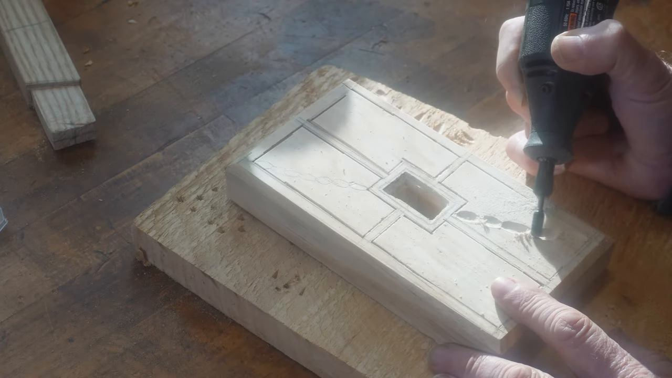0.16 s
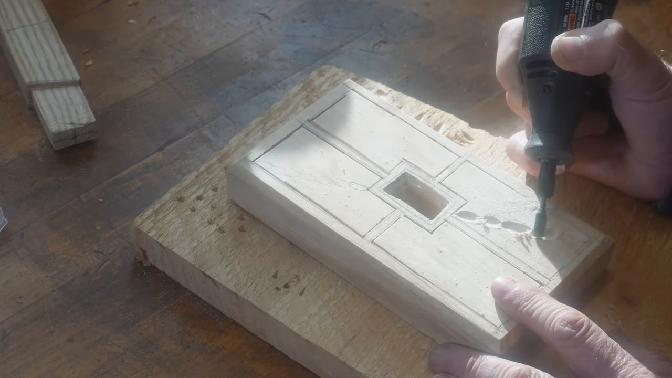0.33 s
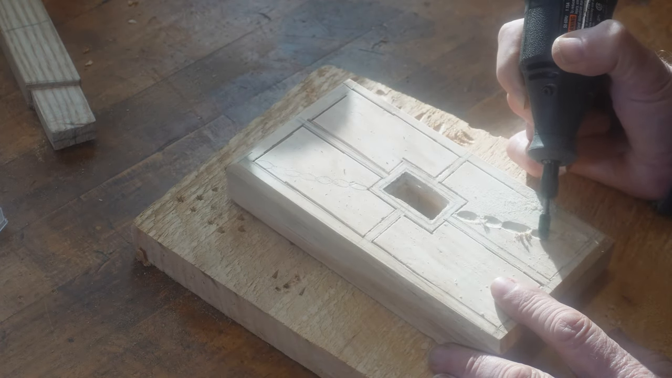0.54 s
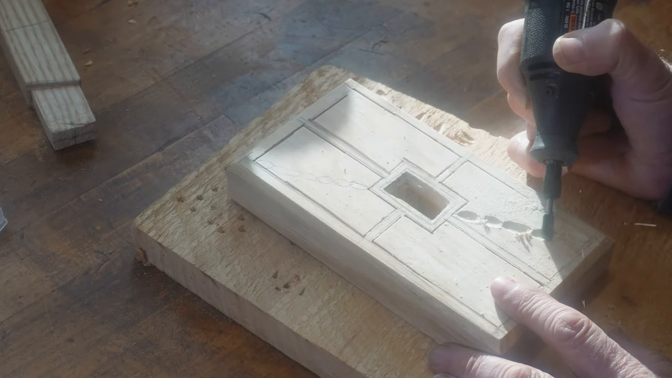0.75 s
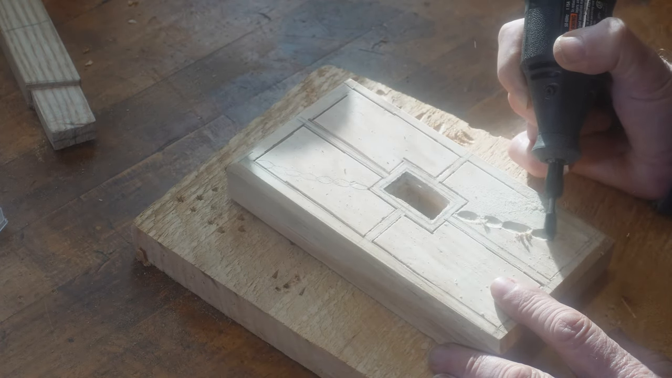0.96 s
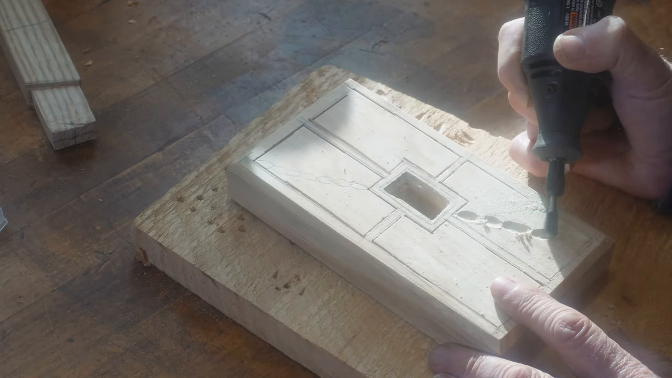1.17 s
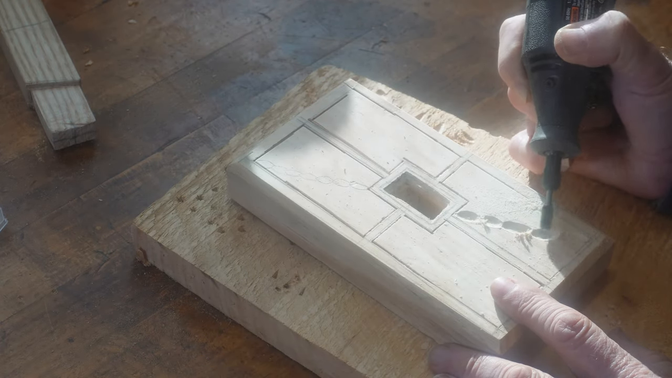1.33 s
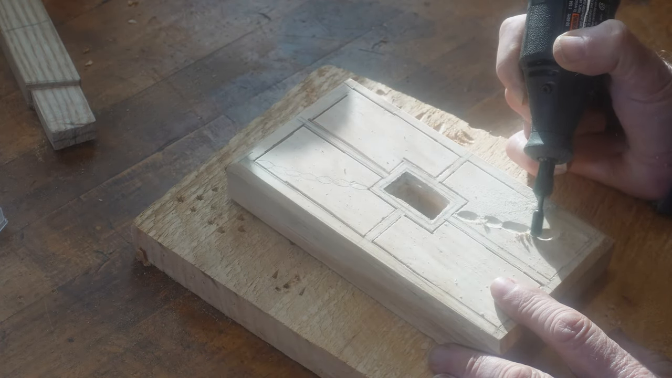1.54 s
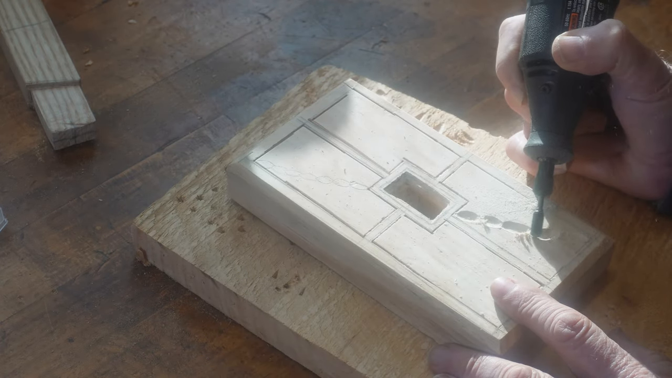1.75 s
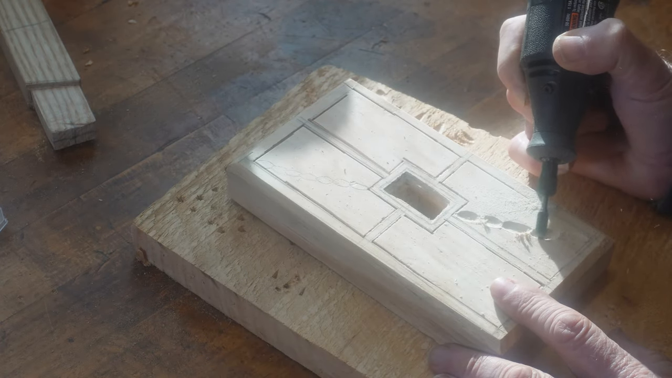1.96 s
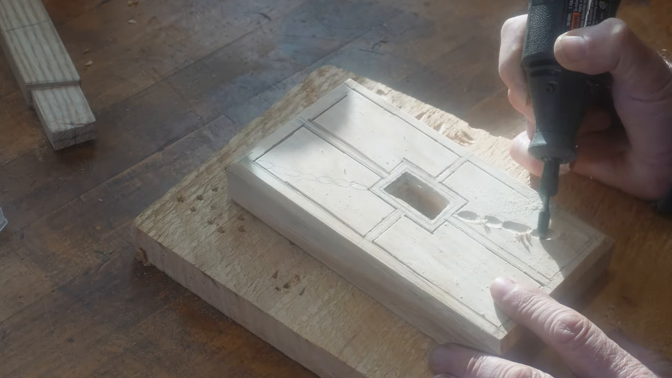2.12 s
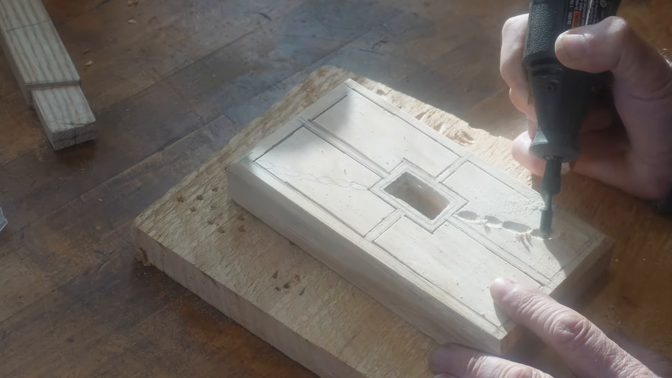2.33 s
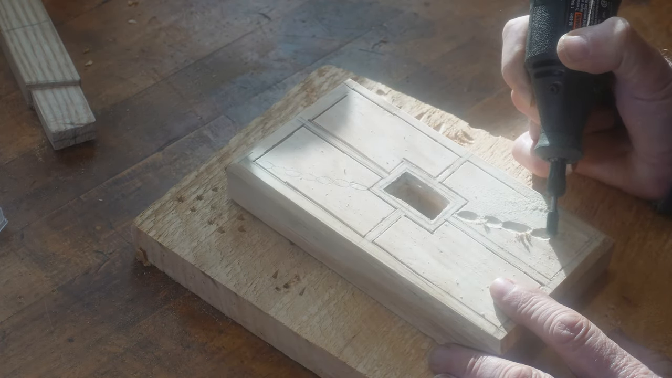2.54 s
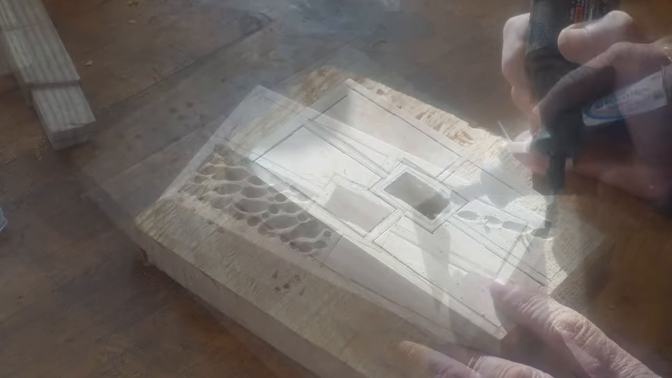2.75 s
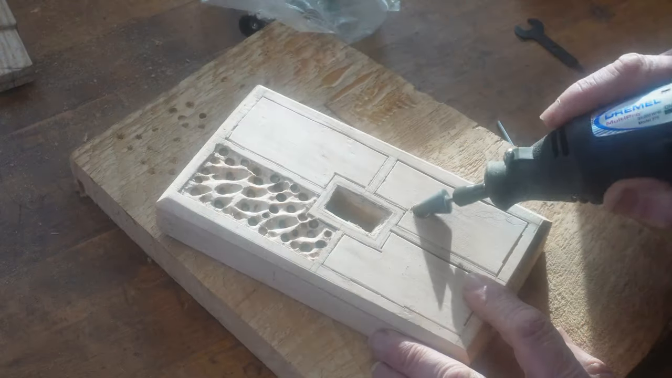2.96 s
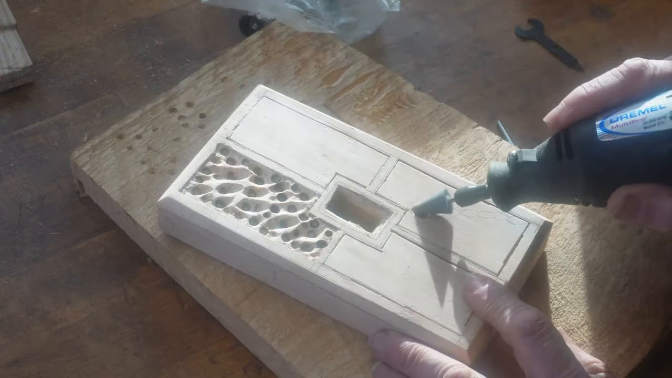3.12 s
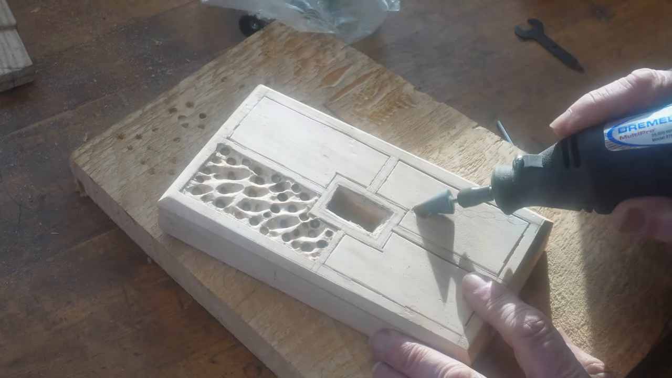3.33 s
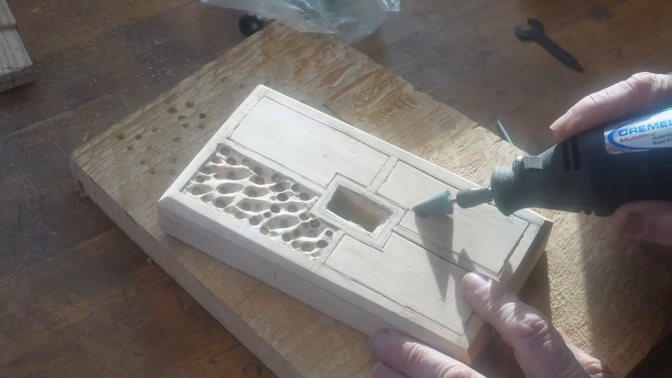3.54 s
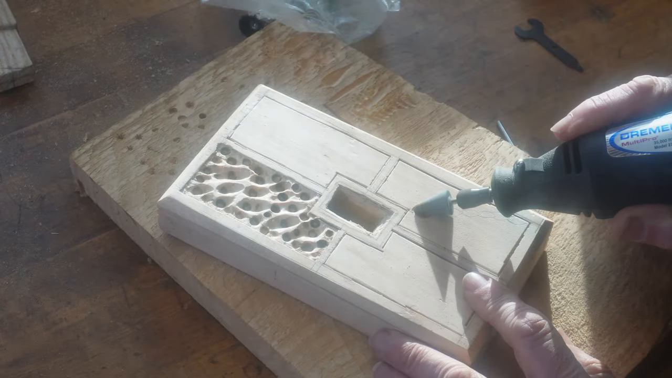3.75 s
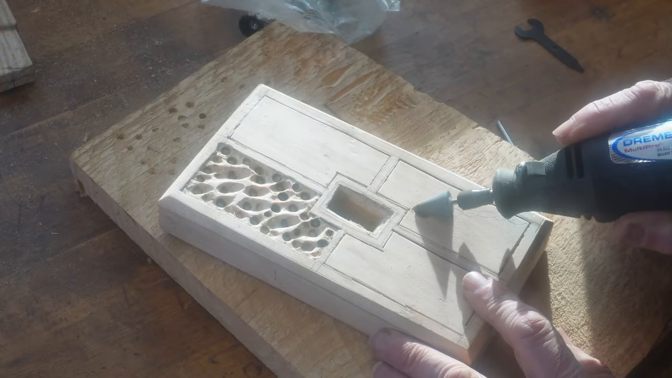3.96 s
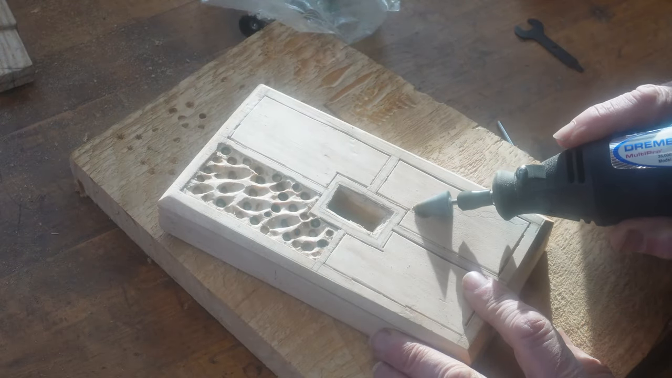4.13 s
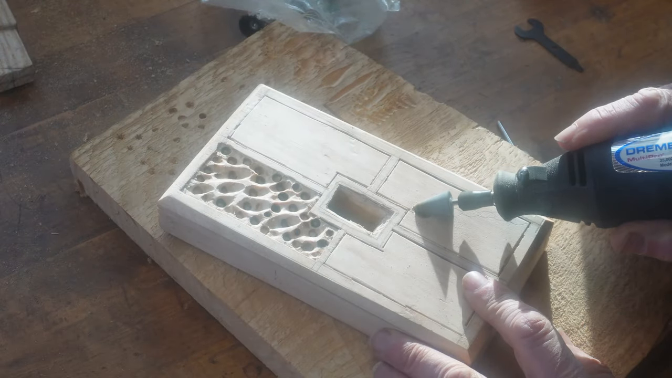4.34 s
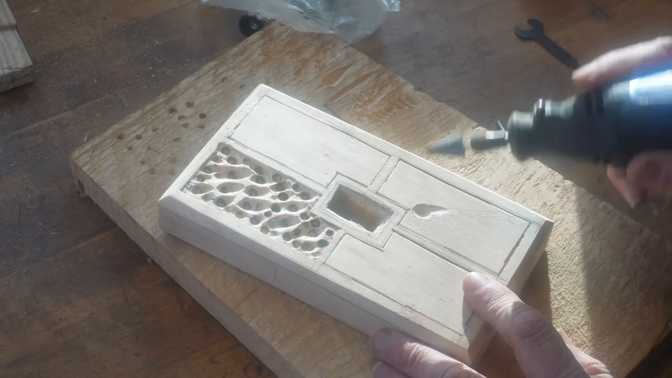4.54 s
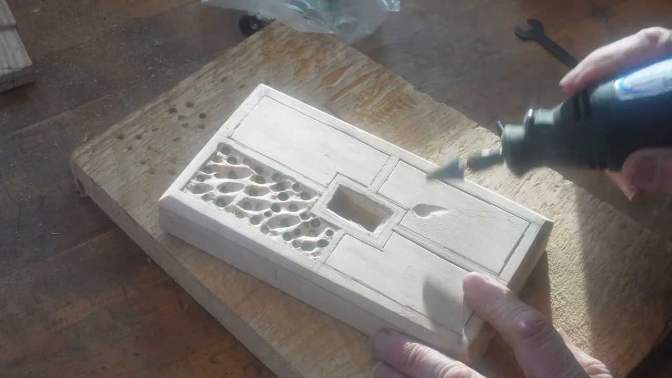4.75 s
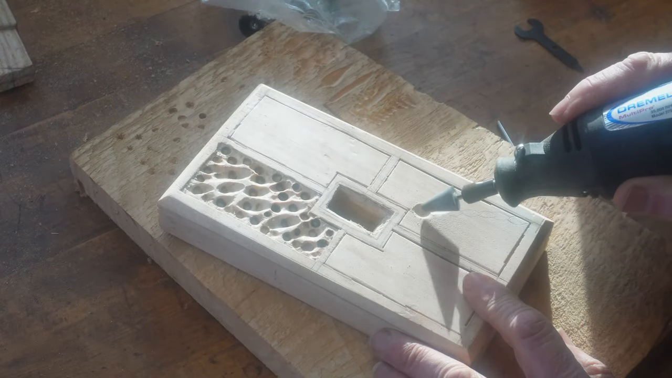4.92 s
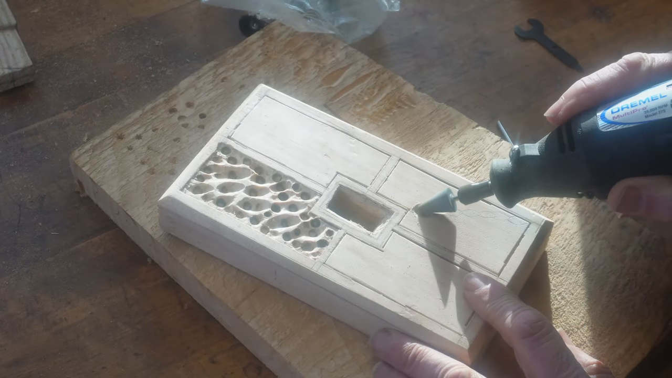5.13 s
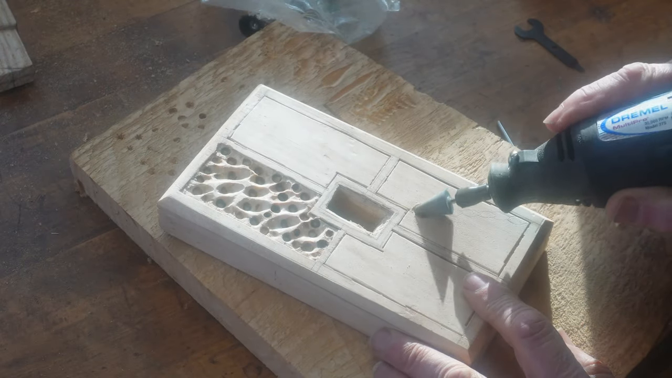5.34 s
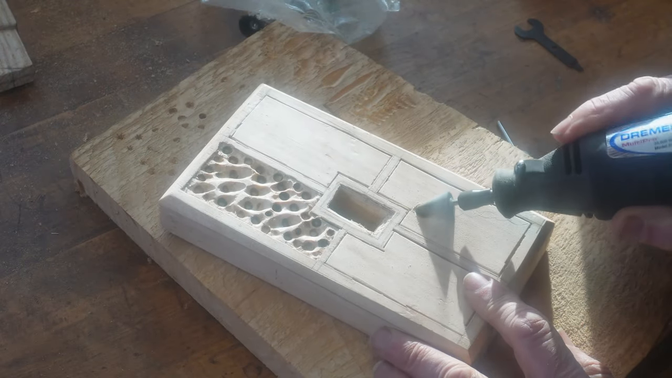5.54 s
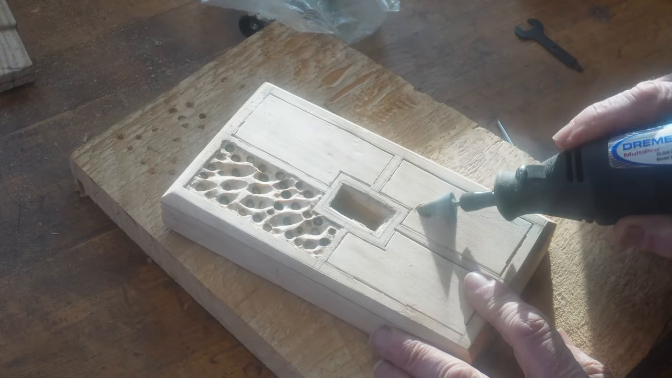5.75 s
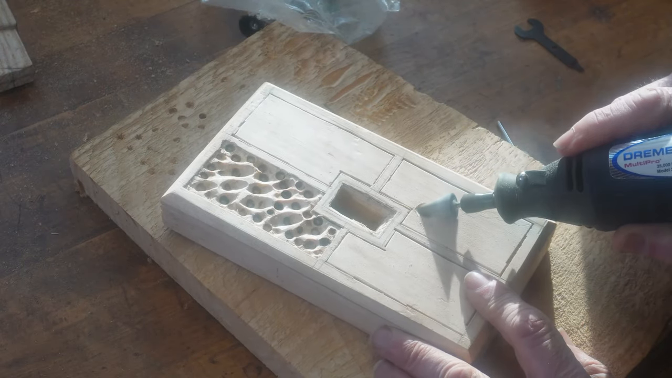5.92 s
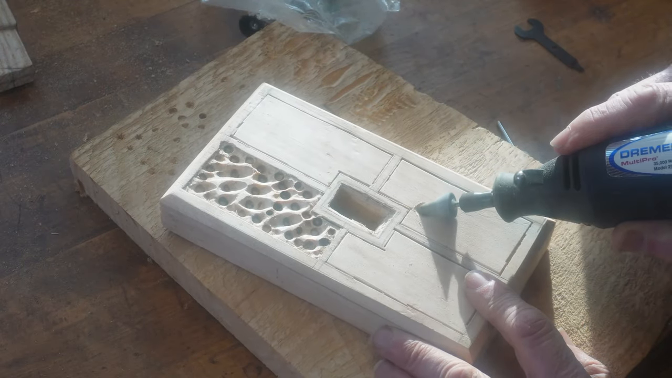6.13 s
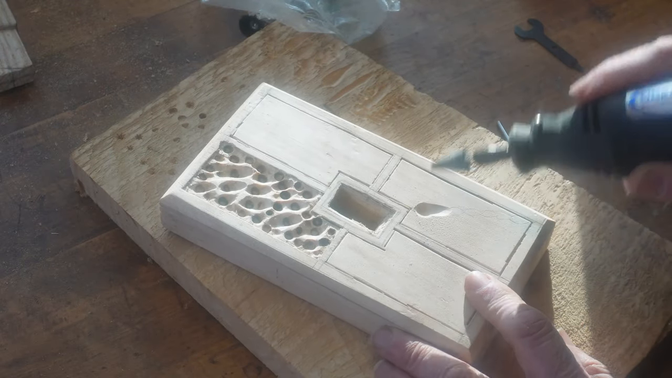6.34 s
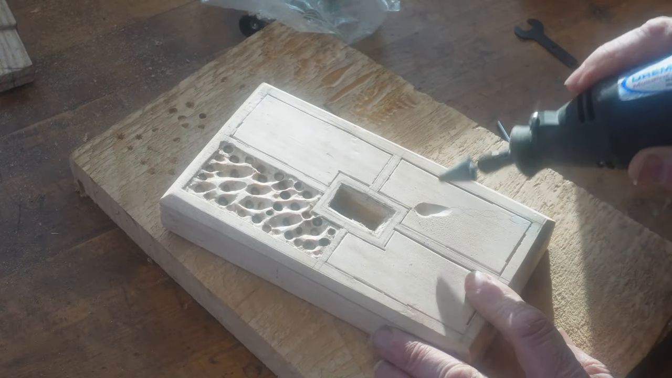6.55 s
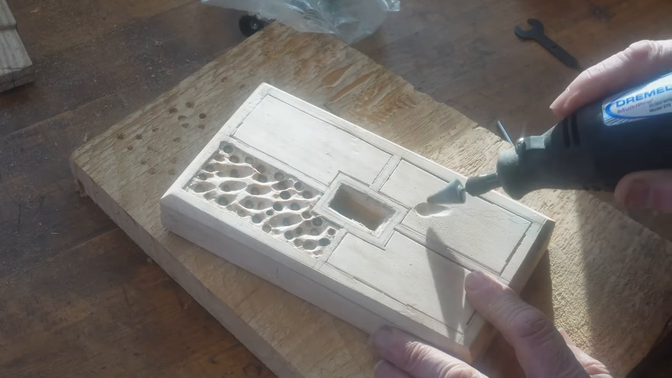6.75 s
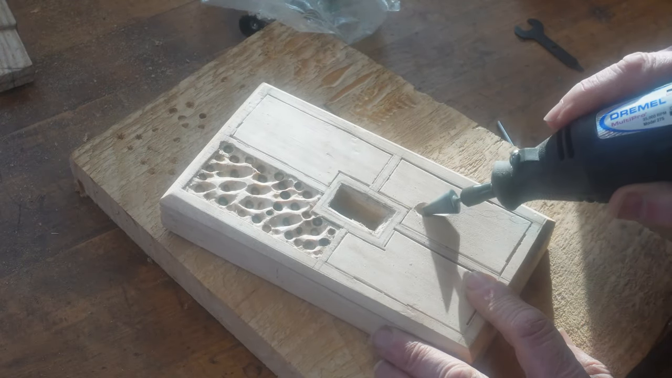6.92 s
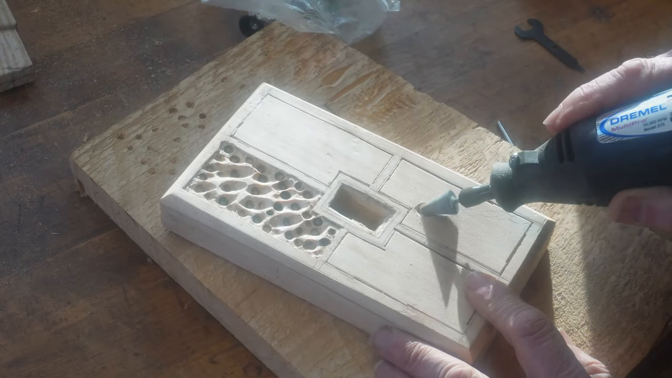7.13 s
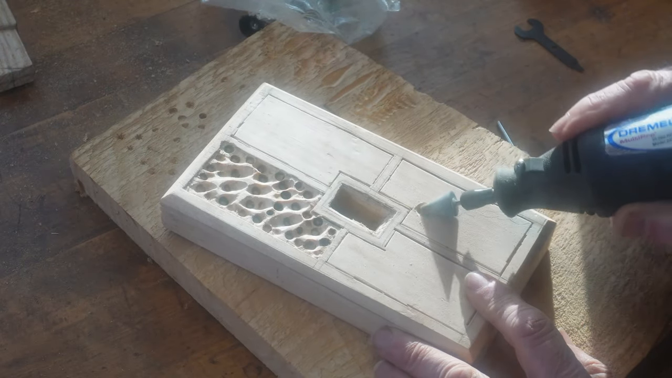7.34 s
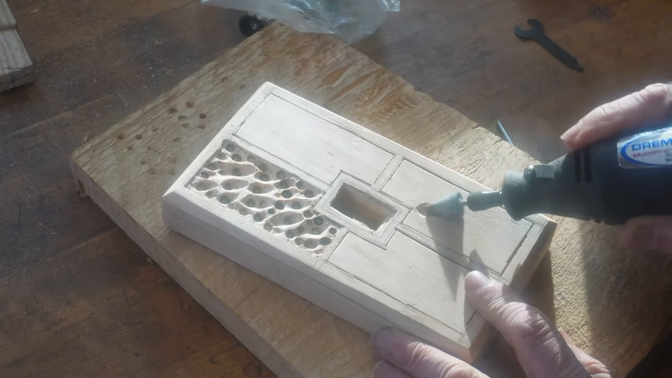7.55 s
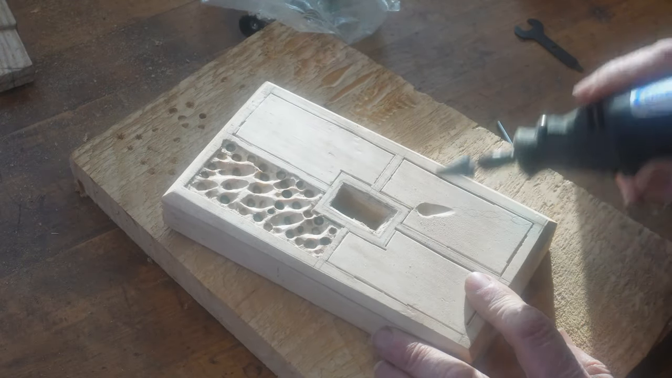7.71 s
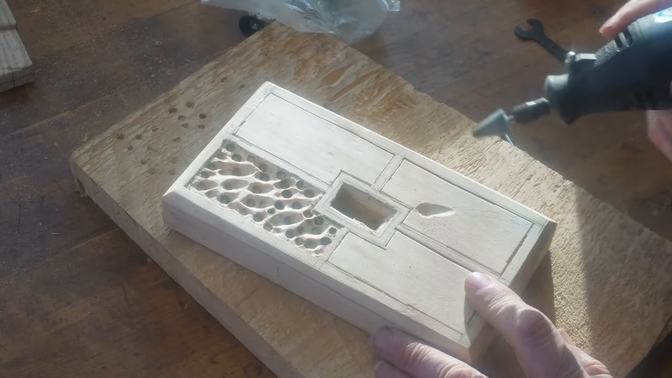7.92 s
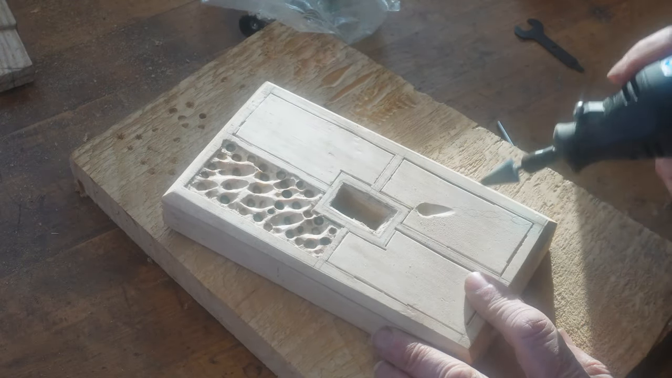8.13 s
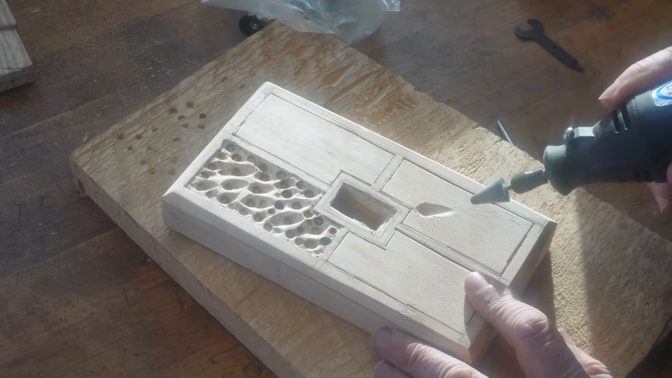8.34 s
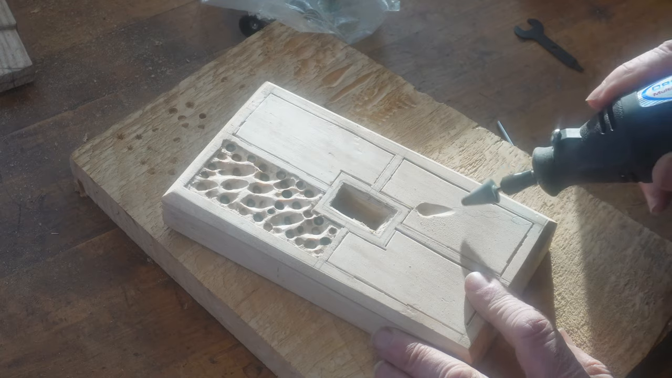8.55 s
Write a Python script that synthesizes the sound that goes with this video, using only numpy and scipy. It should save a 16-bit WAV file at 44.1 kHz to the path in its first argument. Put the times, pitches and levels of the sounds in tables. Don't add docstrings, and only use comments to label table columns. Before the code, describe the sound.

From 0 to about 2.5 seconds a handheld rotary tool makes a bright, steady buzz near 490 hertz with many overtones, lightly rasping wood, slightly easing around 0.8 and wavering faintly around 2 to 2.6. It blends between 2.6 and 3.5 into a deeper cut: a rough, rattling bite that firms into a ringing growl, sliding down in pitch until about 4.5. The burr lifts and the motor springs back up, quieter, whining with fan hiss. Near 5.2 it grazes, then bites at 5.35, dusty and sizzling, sagging much lower to near stall; sharp crackly catches around 6.1 to 6.2, release about 6.35. Free whine climbs again. At 7.1 a third bite bounces, seats and rings, falling until 7.7. Then free spinning whine and hiss rise and level off to the end, about 8.7. Close small microphone, dry bench, short reflections, thin bass.

```python
import sys
import numpy as np
from scipy import signal
from scipy.fft import rfft, irfft, next_fast_len
from scipy.io import wavfile
from scipy.ndimage import uniform_filter1d

SR = 44100
rng = np.random.default_rng(int(sys.argv[2]) if len(sys.argv) > 2 else 0)


def gain_from_db(level_db):
    decades = np.asarray(level_db, float) / 20
    return 10 ** decades


def dump_mix(stems):
    frames = np.atleast_2d(stems).T
    limited = np.clip(frames, -1, 1)
    pcm = np.round(limited * 32767).astype(np.int16)
    wavfile.write(sys.argv[1], SR, pcm)


N = 382788
T = np.arange(N) / SR
SLOW = T[::64]
RIPPLE_HZ = 120
BEAT = np.exp(2j * np.pi * RIPPLE_HZ * T)


def fine(control):
    slope = np.diff(control, append=control[-1])
    return (control[:, None] + slope[:, None] * np.arange(64) / 64).ravel()[:N]


def curves(table):
    s, *columns = np.transpose(table)
    return [np.interp(SLOW, s, c) for c in columns]


def spells(rows):
    return sum(db * np.exp(-((SLOW - s) / half) ** 4) for s, half, db in rows)


def walk(rate_hz):
    knots = rng.standard_normal(int(rate_hz * N / SR) + 2)
    path = np.interp(SLOW * rate_hz, np.arange(len(knots)), knots)
    return uniform_filter1d(path, int(SR / 128 / rate_hz) + 1)


def tone_db(points, hz):
    f, db = np.transpose(points)
    return np.interp(np.log(np.maximum(hz, 1)), np.log(np.maximum(f, 1)), db)


def colour(x, points):
    size = next_fast_len(len(x))
    gain = gain_from_db(tone_db(points, np.fft.rfftfreq(size, 1 / SR)))
    return irfft(rfft(x, size) * gain, size)[:len(x)]


def unit(x):
    return x / np.sqrt(np.mean(np.abs(x) ** 2))


def spin(hz):
    return np.exp(2j * np.pi * np.cumsum(fine(hz)) / SR)


def orders(shaft, levels_db, drift_rad):
    out, turn = 0, 1
    for db in levels_db:
        turn = turn * shaft
        phase = rng.uniform(0, 4.57) + drift_rad * walk(9)
        out = out + turn * fine(np.sqrt(2) * gain_from_db(db) * np.exp(1j * phase))
    return out


def ripple(lower_db, upper_db):
    return 1 + gain_from_db(lower_db) * BEAT.conj() + gain_from_db(upper_db) * BEAT


def rasp(shaft, points, gate, patchy_db):
    noise = colour(rng.standard_normal(N), points)
    return unit(noise * np.exp(gate * shaft.real)) * fine(gain_from_db(patchy_db * walk(14)))


# t/s, shaft f/Hz, cut level/dB, seating 0-1
BITES = [
    [(2.84, 445.5, -36.5, 0), (3.14, 433.6, -33.5, 0.08), (3.3, 432, -35.5, 0.2), (3.42, 430, -34.5, 0.16),
     (3.55, 425, -36, 0.25), (3.73, 418.4, -35.5, 0.44), (3.93, 406.4, -34, 0.94), (4.15, 391.4, -36, 1),
     (4.3, 381.7, -35, 1), (4.42, 370.6, -35.5, 1), (4.51, 365.6, -35, 0.75)],
    [(5.26, 442.7, -44, 0.14), (5.36, 438.4, -35, 0.13), (5.47, 432, -33.5, 0.41), (5.58, 406, -34.5, 0.98),
     (5.8, 338, -34.5, 0.79), (6.045, 322, -36, 0.93), (6.08, 310.8, -37, 0.35), (6.22, 309.4, -37.5, 0.17),
     (6.32, 332, -39, 0.22)],
    [(7.04, 440.6, -47, 0.1), (7.11, 438.7, -36.5, 0.47), (7.165, 436, -35, 0.05), (7.19, 434, -35.5, 0.7),
     (7.23, 434.4, -33, 0.54), (7.34, 411.6, -33.5, .8), (7.45, 383.5, -33.5, 1),
     (7.56, 365.5, -37.5, 0.81), (7.66, 345.3, -35, 0.83), (7.7, 353.6, -35, 0.5)],
]
# dust re cut/dB, extra rasp/dB, extra shank ring/dB, board ring/dB, steadiness when seated 0-1
GRIPS = [
    (-31, 0, -6.5, 1.5, 0.71),
    (-22, -3, 3, -1, 0.7),
    (-21.5, -3.5, 4.5, -2, 0.35),
]
LOWER_S, LIFT_S, LIFT_DB = 0.12, 0.053, -11.5
FREE_HZ, SPIN_UP_S, CREEP_S, CREEP_SHARE = 459.4, 0.235, 0.8, 0.27


def hand():
    rows = []
    for bite, grip in zip(BITES, GRIPS):
        first, last = bite[0], bite[-1]
        rows.append((first[0] - LOWER_S, first[1], -75, first[3], *grip))
        rows += [(*row, *grip) for row in bite]
        rows.append((last[0] + LIFT_S, last[1], last[2] + LIFT_DB, 0, *grip))
        rows.append((last[0] + 2 * LIFT_S, last[1], -75, 0, *grip))
    hz, cut_db, seat, *grip = curves(rows)
    for bite, after in zip(BITES, BITES[1:] + [None]):
        lift_s, lift_hz = bite[-1][:2]
        since = np.maximum(SLOW - lift_s, 0)
        lag = (1 - CREEP_SHARE) * np.exp(-since / SPIN_UP_S) + CREEP_SHARE * np.exp(-since / CREEP_S)
        free = FREE_HZ - (FREE_HZ - lift_hz) * lag
        stop = np.inf
        if after:
            stop, speed = after[0][:2]
            free = free + (speed - np.interp(stop, SLOW, free)) * since / (stop - lift_s)
        hz = np.where((since > 0) & (SLOW < stop), free, hz)
    return uniform_filter1d(hz, size=21), cut_db, np.clip(seat, 0, 1), grip


# t/s, hops since the one above
LANDINGS = [(2.6, 0), (3.137, 46), (3.195, 5), (3.237, 4), (3.274, 3), (3.32, 4), (3.367, 4), (3.43, 6),
            (3.463, 3), (3.495, 3), (3.572, 8), (3.601, 3), (3.653, 5), (3.695, 4), (3.744, 5), (5.13, 132),
            (5.181, 5), (5.233, 5), (5.251, 2), (5.291, 4), (5.325, 3), (5.355, 3), (5.385, 3), (5.451, 7),
            (5.503, 5), (6.995, 146), (7.025, 3), (7.056, 3), (7.086, 3), (7.117, 3), (7.146, 3),
            (7.167, 2), (8.7, 153)]
LANDING_SHARE = 0.12
STALL_HZ = 338


def hopping(hz, seat, depth):
    landing_s, hops = np.transpose(LANDINGS)
    since_landing = np.interp(T, landing_s, np.cumsum(hops)) % 1
    stalled = fine(hz) < STALL_HZ
    stall_hop = spin(hz / 2 * (1 + 0.012 * walk(12)))
    hop = np.where(stalled, stall_hop, np.exp(2j * np.pi * (since_landing - LANDING_SHARE)))
    bounce = np.exp(fine(depth) * hop.real) / fine(np.sqrt(np.i0(2 * depth)))
    cracks = np.exp(-since_landing / LANDING_SHARE) * ~stalled * colour(rng.standard_normal(N), WOOD)
    return hop, bounce, gain_from_db(-4) * fine((1 - seat) ** 2) * unit(cracks)


# f/Hz, level/dB
WOOD = [(250, -34), (560, -40), (1000, -6), (1500, -7), (1950, 0), (2300, 0), (2650, -12), (3080, -3),
        (3500, -10), (4000, -4), (4600, -4), (5200, -15), (7500, -20), (15700, -60)]
# centre t/s, half length/s, level/dB
BITE_SWELLS = [
    [(3.85, 0.12, 0), (4.3, 0.15, -0.5), (5.5, 0.08, 0.5), (5.75, 0.12, -3.5), (7.24, 0.069, 2)],
    [(5.5, 0.059, 11), (3.8, 0.18, 6.5), (4.17, .2, -7), (7.3, 0.11, 8), (7.47, 0.092, 8.5),
     (5.9, 0.066, 6.5), (6.2, 0.14, 12), (7.3, 0.041, 7), (7.63, 0.073, 10)],
    [(3.3, 0.23, 4), (3.8, 0.042, 3), (6.15, 0.045, 3.5), (7.6, 0.035, 4), (5.85, 0.12, 7),
     (5.99, 0.038, 6), (7.27, 0.035, 3.5), (7.51, 0.033, -1.5)],
    [(5.38, 0.11, -5), (7.15, 0.14, -1), (7.64, 0.043, -6), (4.07, 0.066, 2), (5.9, 0.06, -17),
     (5.98, 0.065, -5), (5.6, 0.081, 1)],
    [(3.7, 0.33, -9), (5.45, 0.088, -8), (5.77, 0.029, 6), (7.27, .05, 6), (4.29, 0.12, 3.5),
     (5.7, 0.046, 0.5), (5.93, 0.028, 8), (7.33, 0.11, -11), (7.5, 0.1, 4.5), (7.65, 0.055, 1)],
    [(4.3, 0.58, 2), (5.66, 0.06, -2), (5.88, 0.055, 1.5), (7.38, 0.035, -10), (7.49, .04, 0)],
    [(4.175, 0.27, 6), (5.79, 0.055, -11), (7.58, 0.11, -8), (7.45, .04, 3), (7.33, 0.033, -1)],
    [(5.93, 0.098, -10), (7.3, 0.079, -2), (4.32, 0.27, 8), (5.51, 0.02, 3.5), (7.57, 0.06, 8.5)],
    [(5.59, 0.026, -3), (7.3, 0.18, -2), (5.5, 0.075, -2), (5.85, 0.043, -3), (5.96, 0.082, 4),
     (7.34, 0.053, 2)],
    [(3.8, 0.2, -7), (5.42, 0.068, -14), (7.65, 0.045, -4), (4.22, 0.19, 0.5), (5.66, 0.033, 2),
     (7.48, 0.17, 3)],
]
BOARD_HZ, BOARD_WIDTH_HZ = 3150, 500
DULL_HZ, DULL_DB_PER_KHZ = 4900, -2
HOP_SWING_RAD = 1.6


def tooth_knocks(hz, shaft, seat, hop, board_db, steady):
    levels = []
    for k in range(1, 25):
        db = tone_db(WOOD, k * hz) + 0.8 * walk(5) - 3.5 * np.abs(walk(22))
        db = db + board_db * np.exp(-((k * hz - BOARD_HZ) / BOARD_WIDTH_HZ) ** 2)
        levels.append(db + DULL_DB_PER_KHZ * np.clip(k * hz - DULL_HZ, 0, 2000) / 1000)
    for k, extra_db in ((1, -15), (2, 9), (3, -7)):
        levels[k - 1] = levels[k - 1] + extra_db
    for k, rows in enumerate(BITE_SWELLS, 1):
        levels[k] = levels[k] + spells(rows)
    levels = [db - 2.5 * np.abs(walk(45)) for db in levels]
    jitter = (1 - steady * seat) * (walk(40) + 2.3 * walk(300))
    uneven = shaft * fine(np.exp(0.09j * jitter))
    swing = np.exp(1j * fine(HOP_SWING_RAD * (1 - seat) ** 2) * hop.imag)
    return unit((orders(uneven, levels, drift_rad=0.64) * ripple(-36, -17) * swing).real)


def shank_ring(shaft, bounce, knocks, fibres):
    drive = bounce * (gain_from_db(-4) * knocks + gain_from_db(7.5) * fibres * np.exp(0.3 * shaft.real))
    return colour(drive, [(3300, -37), (3700, 2.5), (4250, -4.0), (4750, -4.5), (5600, 9.0),
                          (7500, 3.0), (9000, -26)])


# centre t/s, half length/s, level/dB
DUST_SPELLS = [(5.48, 0.04, 12.6), (5.62, 0.08, 11.4), (5.81, 0.031, 3.6), (5.99, .04, 7.1),
               (6.08, 0.018, 10), (7.33, 0.022, 6.6), (7.39, 0.025, 8.7), (7.47, 0.057, 9.3),
               (7.59, 0.03, 4.8), (7.64, 0.026, 7)]


def flying_dust(shaft, hop):
    tone = [(8400, -33.5), (9200, 10), (11600, 6.5), (12000, -36), (15000, -37)]
    sizzle = rasp(shaft, tone, gate=1.0, patchy_db=-1.5)
    return sizzle * fine(gain_from_db(spells(DUST_SPELLS) - 4)) * unit(np.exp(0.6 * hop.real))


def narrow_shank_ring(seat, bounce, fibres):
    band = [(7000, -45), (7310, 0), (7490, 0), (7800, -45)]
    return gain_from_db(-16) * fine(seat) * unit(colour(bounce * fibres, band))


# t/s, peak level/dB
SNAGS = [
    (6.0694, -19),
    (6.0944, -22),
    (6.1102, -24),
    (6.1203, -22),
    (6.1464, -18),
    (6.1793, -20.5),
    (6.1924, -25),
    (6.2437, -41),
    (6.2584, -30),
    (6.3146, -35),
]
SNAG_S = 0.00084


def snagging():
    bursts = sum(gain_from_db(db - 8) * np.exp(-np.maximum(T - s, 0) / SNAG_S) * (T >= s) for s, db in SNAGS)
    return colour(bursts * rng.standard_normal(N),
                  [(800, -6), (2000, -7), (5000, 11.5), (13500, -11), (14500, -32)])


# t/s, length/s, level/dB
TOUCHES = [
    (5.153, .032, -43),
    (5.245, .02, -45),
    (7.012, 0.026, -43.5),
    (7.111, .025, -43),
]


def grazing(shaft, bounce):
    touch = sum(gain_from_db(db) * np.exp(-((T - s) / length) ** 4) for s, length, db in TOUCHES)
    return touch * bounce * rasp(shaft, WOOD, gate=0.62, patchy_db=1.0)


# centre t/s, half length/s, level/dB
SHANK_SPELLS = [
    (5.42, .2, 4.5),
    (5.88, 0.11, -5.5),
    (6.2, 0.092, -1),
    (7.16, 0.065, 3.5),
    (7.4, .08, 2),
    (7.62, 0.076, 3.5),
]
# f/Hz, level/dB
LOOSE_TONE = [(900, 0), (1250, 2), (1800, 2), (2250, -3), (3000, 1), (3450, 0), (4000, 2.5), (4600, -3.5)]


def burr(hz, shaft, fade, cut_db, seat, sizzle_db, torn_db, shank_db, board_db, steady):
    def by_seat(loose, firm):
        return loose + (firm - loose) * seat
    stall_db = 3 * (1 - seat) * (hz < STALL_HZ)
    rasp_db = by_seat(-1.5, -11) + torn_db + stall_db
    ring_db = by_seat(-16.5, -2.5) + shank_db + spells(SHANK_SPELLS)
    depth = by_seat(0.7, 0.03)
    hop, bounce, cracks = hopping(hz, seat, depth)
    knocks = tooth_knocks(hz, shaft, seat, hop, board_db, steady)
    knocks = knocks * fine(1 / np.sqrt(1 + gain_from_db(2 * rasp_db)))
    fibres = rasp(shaft, WOOD, gate=0.37, patchy_db=1.0) * fine(1 / np.sqrt(1 + gain_from_db(-2 * rasp_db)))
    body = colour(bounce * (knocks + fibres), [(3300, 1.03), (3900, 0.73)]) + cracks
    body = fine(seat) * body + fine(1 - seat) * colour(body, LOOSE_TONE)
    whirl = fine(depth ** 2) * (gain_from_db(-22.5) * shaft / hop + gain_from_db(-17.5) * shaft * hop).real
    chatter_db = 2.5 * walk(32)
    ring = fine(gain_from_db(ring_db + chatter_db - 1.0)) * shank_ring(shaft, bounce, knocks, fibres)
    dust = fine(gain_from_db(sizzle_db + chatter_db + 0.5 * seat)) * flying_dust(shaft, hop)
    cut = body + narrow_shank_ring(seat, bounce, fibres) + whirl + ring + dust
    return grazing(shaft, bounce) + snagging() + fade * fine(gain_from_db(cut_db)) * cut


# t/s, shaft f/Hz, rasp level/dB
SHALLOW = [
    (0, 495.3, -44.5),
    (.42, 491.6, -44.5),
    (.75, 491.5, -48),
    (1.05, 490.6, -46),
    (1.45, 495.8, -44.5),
    (1.8, 493.8, -44),
    (2.0, 489.6, -45),
    (2.4, 490, -45),
    (2.95, 496.6, -44),
]
SHALLOW_ORDERS = [-8.5, -7.5, -1, -5, -7.5, -12.5, -14.5, -10.5, -13, -12.5, -11.5, -4, -15.5, -21, -18,
                  -13.5, -20.5, -19.5]
# f/Hz, level/dB per Hz
SHALLOW_TONE = [(120, -95), (200, -94), (438, -82), (489, -31), (801, -84), (979, 1.5), (1070, -14.5),
                (2000, 3), (2720, -9), (2930, -18), (3210, -9), (7560, -7.5), (15700, -11)]
# level re rasp/dB, gain at full wobble/dB, gain per dB of pressure/dB
SHALLOW_LOW = [
    (-15, 2, -0.5),
    (2.5, -2.5, 1),
    (1.5, 4, 1.3),
    (0.9, 8.5, 0.5),
    (0, -5.5, 0),
    (3.5, 0, 0.5),
    (-2.5, -3, 1.5),
    (-1, 1.5, 0),
]
# centre t/s, half length/s, level/dB
SHALLOW_SWELLS = [
    [(1.56, .12, -1.5), (.87, 0.12, -4), (2.0, 0.05, -3), (2.6, .06, -8), (2.8, 0.16, 0.5)],
    [(1.75, 0.12, -1), (0.96, 0.08, -4), (2.21, 0.31, 5.5), (2.75, 0.2, -3)],
    [(0.28, 0.063, 1.5), (1.78, 0.36, 0), (2.1, 0.16, -1.5), (0.14, 0.092, -5), (1.61, .1, 2.5)],
    [(.3, 0.27, 3), (1.1, 0.12, -8), (1.85, 0.15, 4.5), (2.3, .1, -4)],
    [(.76, 0.12, -12), (1.15, .15, 2.5), (2.45, 0.072, -6.5)],
    [(1.01, 0.087, 4.5), (.5, .1, 3), (1.86, 0.067, -11), (1.3, 0.21, 4), (2.02, 0.27, 8), (2, 0.046, -4),
     (2, 0.042, 3)],
    [(.45, 0.24, -5), (2.65, 0.087, -4), (.1, 0.17, 0), (1.55, 0.25, 1), (2.15, 0.2, -4),
     (2.45, 0.057, 2.5)],
    [(1.544, 0.11, 8), (1.214, 0.14, -2), (2.45, 0.065, 8.5)],
    [(.12, 0.18, 2.5), (1.15, 0.097, -5), (1.7, 0.2, 2), (2.43, 0.077, 8)],
    [(2.27, .15, -2), (1.03, 0.2, -5)],
]
# start t/s, end t/s, depth 0-1
WOBBLES = [
    (0.025, 0.575, 0.04),
    (0.586, 1.117, 0.07),
    (1.93, 2.622, 0.13),
]
WOBBLE_ONSET_S, FULL_WOBBLE = 0.032, 0.15
USUAL_RASP_DB = -44.5
SHAKE_HZ, SHAKE_PER_HZ = 495.3, 0.038


def shallow_pass():
    hz, rasp_db = curves(SHALLOW)
    wobble = 0
    for start, end, depth in WOBBLES:
        inside_s = np.minimum(SLOW - start, end - SLOW)
        wobble = wobble + depth * np.clip(inside_s / WOBBLE_ONSET_S + 0.5, 0, 1)
    low = []
    for db, gain_db, push in SHALLOW_LOW:
        lean_db = gain_db * wobble / FULL_WOBBLE + push * (rasp_db - USUAL_RASP_DB)
        low.append(rasp_db + db + lean_db + 0.53 * walk(4.63))
    unbalance_db, *low_db, tenth_db, whine_db = low
    shaft = spin(hz)
    levels = [-120 + 0 * hz] + low_db
    levels += [rasp_db + db + 2.6 + 2.2 * walk(3) + 1.5 * walk(15) for db in SHALLOW_ORDERS]
    levels += [rasp_db - 25 + 4.1 * walk(5) for _ in range(25, 32)]
    levels[8] = tenth_db - 3.5 + 2.8 * walk(2.5)
    levels[9], levels[17] = tenth_db, whine_db
    for k, rows in enumerate(SHALLOW_SWELLS, 1):
        levels[k] = levels[k] + spells(rows)
    tone = orders(shaft, levels, drift_rad=0.21) * ripple(-24.0, -23.5)
    tone = tone * (1 + fine(wobble) * spin(-hz / 2))
    shake = fine(np.clip(SHAKE_PER_HZ * (SHAKE_HZ - hz), 0, 0.2)) * (ripple(0, -42) - 1)
    tone = tone + np.sqrt(2) * fine(gain_from_db(unbalance_db)) * shaft * (1 + shake)
    fibres = rasp(shaft, SHALLOW_TONE, gate=0.067, patchy_db=3.0)
    return tone.real + fine(gain_from_db(rasp_db)) * fibres * ripple(-38, -38).real


# shaft multiple, level/dB
FREE_ORDERS = [(2, -74), (4, -69), (5, -69), (6, -67), (7, -62), (9, -64), (10, -69), (15, -68), (16, -65),
               (17, -69), (26, -73), (33, -77)]


def motor(shaft, unbalance, third, whine, slot, octave, weak):
    angle = np.angle(shaft)

    def order(k):
        return np.exp(1j * k * angle)
    weak = weak * sum(fine(gain_from_db(db + 3 * walk(5))) * order(k) for k, db in FREE_ORDERS) * ripple(-8, -15)
    slots = slot * order(8) * ripple(0.52, -4.5)
    whine = whine * fine(gain_from_db(3.24 * walk(25))) * order(18) * ripple(-24, -22)
    octave = octave * fine(gain_from_db(5 * walk(30))) * order(36)
    clean = unbalance * shaft + third * order(3) * ripple(-26, -26)
    return np.sqrt(2) * (weak + slots + whine + octave + clean).real


# shaft f/Hz, unbalance/dB, third order/dB, whine/dB, slot tone/dB
HOUSING = [(306.6, -57, -52.5, -64, -74), (346, -59, -50, -57, -54), (375, -71, -71, -55.5, -47),
           (381, -62, -58.5, -54.5, -46.5), (406, -70, -69, -53.5, -55), (434, -60, -58.5, -48, -57.5),
           (442.3, -64, -52, -44, -57.5), (450.4, -60.5, -51, -46.5, -57)]
# slot tone/dB, whine/dB, weak orders/dB
SPINS = [
    (4, 1.5, 1.5),
    (1, 2.5, 0.5),
    (-3.5, 3.5, 5),
]
# centre t/s, half length/s, level/dB
SHAFT_DIPS = [
    (4.03, 0.032, -10),
    (4.45, 0.036, 0),
    (5.58, 0.027, -10),
    (5.79, 0.017, -8),
    (6.33, 0.039, -19),
    (7.53, 0.036, -14),
    (8.0, 0.04, -10),
]
# centre t/s, half length/s, level/dB
THIRD_SPELLS = [
    (8.5, 0.05, 4),
    (8.4, .03, -6),
    (8.6, 0.021, -6),
    (6.35, 0.047, -9),
]


def loaded_motor(hz, shaft, fade, cut_db, seat, load):
    speeds, *housing = np.transpose(HOUSING)
    unbalance, third, whine, slot = (gain_from_db(np.interp(hz, speeds, db) + 0.6 * walk(6.9)) for db in housing)
    ends = [bite[-1][0] for bite in BITES]
    latest = np.maximum(np.searchsorted(ends, SLOW) - 1, 0)
    slot_db, whine_db, weak_db = (uniform_filter1d(np.array(db)[latest], size=41)
                                  for db in np.transpose(SPINS))
    unbalance = unbalance * gain_from_db(spells(SHAFT_DIPS))
    third = third * gain_from_db(spells(THIRD_SPELLS)) * fade[::64]
    third = third + seat * gain_from_db(cut_db - 10.5 - 1.94 * np.abs(walk(16)))
    whine = whine * gain_from_db(whine_db - 16 * load)
    slot = slot * gain_from_db(slot_db * np.clip((hz - 385) / 25, 0, 1) - 8 * load)
    octave = gain_from_db(np.interp(hz, [365, 400, 440], [-68, -70, -72]) - 12 * load)
    tones = [fade ** 0.27 * fine(gain) for gain in (unbalance, third, whine, slot, octave)]
    return motor(shaft, *tones, fade * fine(gain_from_db(weak_db - 12 * load)))


# f/Hz, level/dB per Hz
AIR_TONE = [(150, -82), (300, -50), (560, -29.5), (800, -19), (1280, -2.5), (2290, -3.5), (3120, -3),
            (3650, -3), (5080, -7.5), (7000, -4), (8760, -10), (13400, -12.5), (15700, -15)]


def air(shaft, level_db, top_db):
    noise = unit(colour(rng.standard_normal(N), AIR_TONE))
    bands = 0
    for f in 300 * 2. ** np.arange(7):
        flicker_db = 1.6 * walk(4) + 1.8 * walk(13) + top_db * (f > 9000)
        bands = bands + colour(noise, [(f / 2, -20), (f, 0), (2 * f, -20)]) * fine(gain_from_db(flicker_db))
    return fine(gain_from_db(level_db + 11.5)) * bands * (1 + 0.19 * shaft.real) * ripple(-45, -45).real


# f/Hz, side re mid level/dB
WIDTH = [(60, -11), (110, -20), (200, -84), (380, -27), (700, -15.5), (1290, -14), (2380, -12), (4400, -9),
         (8120, -7), (15000, -2)]


def bench_scatter(mid):
    lag = np.arange(int(0.12 * SR)) / SR
    echoes = rng.standard_normal((2, len(lag))) * np.exp(-lag / 0.12)
    near, side = (signal.fftconvolve(mid, e / np.sqrt(np.sum(e ** 2)))[:N] for e in echoes)
    mid = mid + gain_from_db(-13) * near
    side = gain_from_db(-2.5) * colour(side, WIDTH)
    return np.array([(mid + side) * gain_from_db(-0.8), (mid - side) * gain_from_db(0.8)])


DISSOLVE_S, DISSOLVE_LENGTH_S = 2.563, 0.93
AIR_DB, AIR_SHALLOW_DB, AIR_DUCK_DB, TOP_LOAD_DB = -59, 3, -2.5, 0.5


def scene():
    hz, cut_db, seat, grip = hand()
    shaft = spin(hz)
    fade = np.clip((T - DISSOLVE_S) / DISSOLVE_LENGTH_S, 0, 1)
    load = uniform_filter1d(seat * (cut_db > -50), size=41)
    air_db = AIR_DB + AIR_SHALLOW_DB * (1 - fade[::64]) + AIR_DUCK_DB * load
    mid = burr(hz, shaft, fade, cut_db, seat, *grip)
    mid = mid + (1 - fade) * shallow_pass()
    mid = mid + loaded_motor(hz, shaft, fade, cut_db, seat, load)
    mid = mid + air(shaft, air_db, TOP_LOAD_DB * load)
    return bench_scatter(mid)


def roll_off(x):
    return signal.sosfilt(signal.butter(12, 15790, fs=SR, output="sos"), x)


def record(dry):
    rounded = 0.125 * np.tanh(dry / 0.125)
    low_cut = signal.butter(4, 240, "high", fs=SR, output="sos")
    cut = signal.sosfilt(low_cut, rounded)
    rumble_band = signal.butter(1, [12, 160], "band", fs=SR, output="sos")
    rumble = signal.sosfilt(rumble_band, cut.mean(axis=0) ** 2)
    return roll_off(cut + 0.09 * rumble)


dry = scene()
out = record(dry)
dump_mix(out)
```